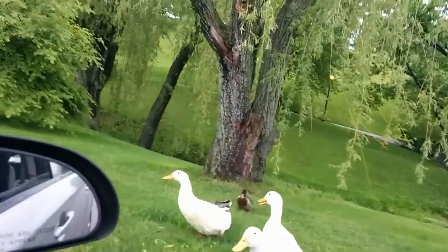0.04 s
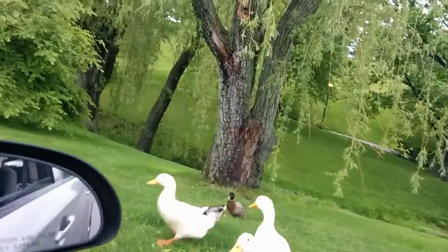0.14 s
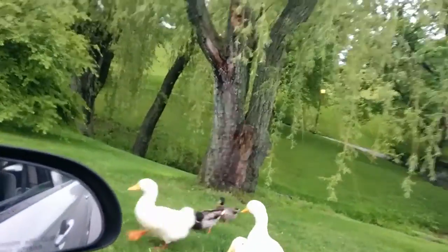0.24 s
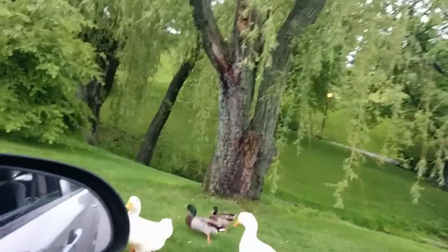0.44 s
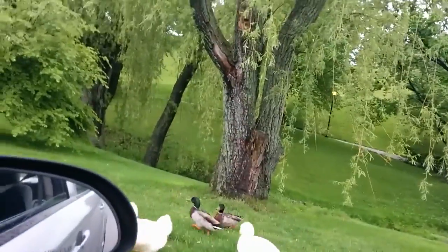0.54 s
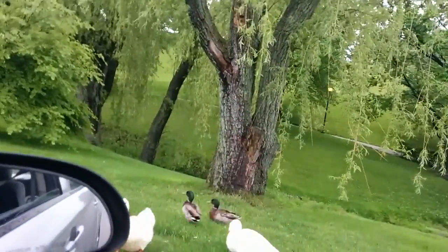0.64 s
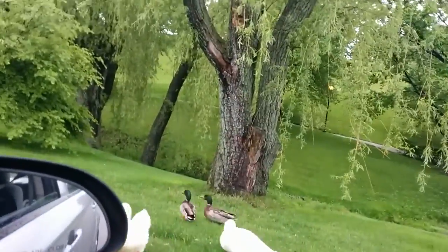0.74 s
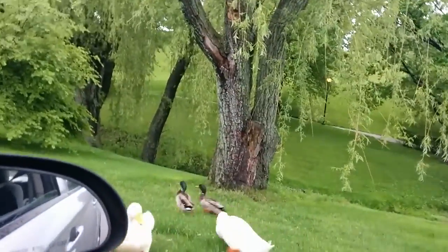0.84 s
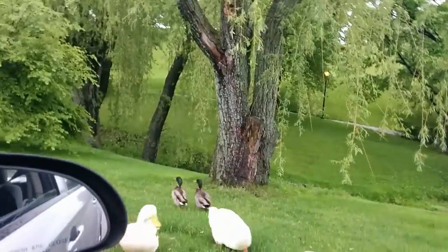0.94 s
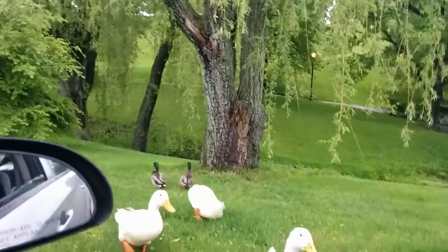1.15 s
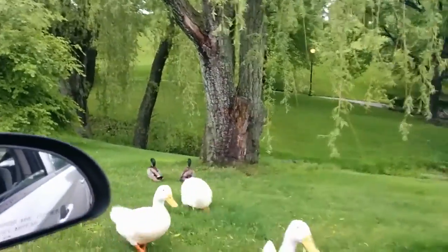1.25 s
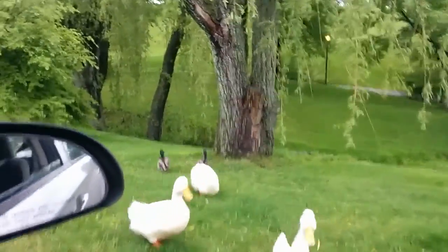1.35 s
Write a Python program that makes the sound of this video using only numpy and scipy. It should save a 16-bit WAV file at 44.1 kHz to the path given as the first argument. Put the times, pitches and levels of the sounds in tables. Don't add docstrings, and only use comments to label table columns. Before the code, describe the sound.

Ducks quacking: three quick loud calls from a near hen, softer rasps and mutters behind

```python
import sys
import numpy as np
from scipy import signal
from scipy.fft import rfft, irfft
from scipy.io import wavfile

SR = 44100
rng = np.random.default_rng(int(sys.argv[2]) if len(sys.argv) > 2 else 0)


def amplitude_ratio(level_db):
    exponent = np.asarray(level_db, float) / 20
    return 10 ** exponent


def file_out(sig):
    cols = np.atleast_2d(sig).T
    lim = np.clip(cols, -1, 1)
    pcm = np.round(lim * 32767).astype(np.int16)
    wavfile.write(sys.argv[1], SR, pcm)


N = 61739
T = np.arange(N) / SR

# start_s, length_s, level_db, pulse_rate_hz, top_resonances_db
CHATTER = [(-.03, 0.087, -41, 127.3, -2), (.04, 0.061, -51, 117.8, 1.5), (.385, 0.023, -35, 159, -5.5),
           (.52, 0.032, -38, 143.3, -30.5)]
# centre_hz, width_hz, level_db
FAR_LOW = [(565, 300, -1.5), (958, 240, 1), (1110, 237, 5), (1450, 370, -13), (1667, 67, -8)]
FAR_HIGH = [(2556, 180, -10.5), (3000, 260, -1.5), (3660, 200, -37)]
# start_s, length_s, level_db
RUSTLES = [(-.02, 0.1, -60.5), (0.125, 0.21, -59.5), (0.371, 0.51, -65.5), (0.579, 0.13, -56.5),
           (0.78, 0.076, -108), (0.859, 0.13, -64), (1.272, 0.61, -68), (1.292, 0.0088, -77),
           (.891, .016, -52), (1.27, 0.024, -71.5)]
# frequency_hz, density_db
RUSTLE_SPECTRUM = [(3000, 4), (4500, -5.5), (7000, 1), (9500, -4.5), (12000, -14.5), (16000, -22.5)]
AIR_SPECTRUM = [(40, -7), (100, -5.5), (180, -4.5), (440, -8), (900, -13), (2200, -23.5), (4400, -36),
                (15900, -37)]
# time_s, level_db
BREEZE = [(0, 2), (.1, 0.5), (.25, 5), (.35, -2.5), (.55, 5.5), (.72, -5), (.9, -7.5), (1.02, -2),
          (1.2, -2.5), (1.4, -4.5)]
# start_s, length_s, peak_db, pitch_hz
PUFFS = [(-.01, 0.062, -54.5, 127), (.12, 0.026, -56, 151), (.21, 0.089, -56.5, 82), (.3, 0.036, -60, 83.8),
         (.575, 0.03, -61, 78.5), (.62, 0.054, -59.5, 81.6), (.62, 0.032, -54, 170),
         (1.19, 0.043, -52.5, 91), (1.3, 0.031, -71, 90.4)]
# start_s, length_s, level_db, pulse_rate_hz, top_resonances_db
MURMURS = [(.935, .15, -60, 73, -9), (0.94, 0.12, -48, 63, 4), (0.0, 0.05, -55.5, 89, -1.5),
           (.55, 0.069, -46, 76, 2.5)]
# centre_hz, width_hz, level_db
CHEST_LOW = [(184.6, 44, 0.61), (285, 44, 1.2)]
CHEST_HIGH = [(354.5, 43, 0.57)]
# start_s, length_s, level_db, ring_hz
CLACKS = [(0.123, 0.036, -42, 3180), (.503, 0.022, -44, 3640), (0.504, 0.02, -47.5, 2565),
          (0.53, 0.029, -47.5, 2710), (.892, 0.0095, -36, 4946), (0.9, 0.034, -46.5, 3134),
          (0.895, 0.022, -45.5, 3750), (1.303, 0.024, -44.5, 3716), (1.302, 0.023, -48.5, 3200),
          (1.302, .05, -53.5, 2550)]
# start_s, length_s, level_db, pulse_rate_hz, top_resonances_db
YOUNG = [(.128, 0.07, -40.5, 124.7, -9), (.16, 0.085, -41, 150.7, -4.5)]
# centre_hz, width_hz, level_db
YOUNG_LOW = [(495, 170, -7.5), (1170, 89, 3), (1440, 110, 1), (1855, 87, 4.5), (2430, 240, -6.5)]
YOUNG_HIGH = [(2790, 150, -12), (3330, 95, -26), (3820, 95, -5)]
# strongest_pulse_s, peak_db, pulse_rate_hz, throat_pitch_factor, top_resonances_db
QUACKS = [
    (0.2507, -15, 144, 1.016, -11.5),
    (0.4328, -10, 182.2, 1.034, -3.5),
    (0.5777, -14.5, 164.7, 1.1, -1),
]
# time_s, effort_db, hoarse_top_db
EFFORT = [
    [(.232, -29, 9), (.237, -4, 6), (.244, -2.5, -4), (.251, -1.4, -1), (.258, -2, -0.5), (.266, -11.5, 4),
     (.273, -10.5, 8), (.281, -19.5, 7), (.288, -39, 5)],
    [(.405, -30, 11), (.416, -15.5, 6), (.428, -5.5, 1.5), (.433, 0.76, -6.5), (.439, -5.5, 11),
     (.451, -8.5, 7), (.464, -12.5, -4.5), (.479, -21, 15.5), (.486, -47, 10)],
    [(.557, -30, 22), (.564, -16, 20), (.572, -9.5, 16.5), (.578, -0.23, -1), (.585, -6.5, 5.5),
     (.591, -2, 0.5), (.598, -10.5, -1.5), (.604, -10.5, 3), (.612, -35.5, 11.5)],
]
# centre_hz, width_hz, level_db
HEN_LOW = [(512, 239, 0), (1076.5, 95.6, 9), (1507, 92, 2), (1751, 172, -7.5), (2502, 63, -15.5),
           (1276, 121, -3)]
HEN_HIGH = [(3602, 370, -18), (4378, 310, -17.5), (5007, 160, -16.5), (5756, 220, -19.5), (6528, 250, -29),
            (7620, 820, -40.5), (11100, 3250, -43.5)]
HEN_CHEST = [(170, 100, -11)]
# start_s, length_s, level_db, pitch_hz, glide_hz_per_s
HUMS = [(.215, 0.032, -31, 680, -1000), (.392, 0.028, -38, 1000, 2996.5), (.402, 0.023, -31, 700, -2000),
        (.549, 0.0195, -30, 810, -12000), (.556, 0.023, -27, 1490, -3000), (.549, 0.017, -36, 1820, 1003),
        (.526, 0.02, -37.5, 960, -3000), (.835, 0.1, -55, 770, -100), (1.3, .078, -50.5, 1100, 898),
        (1.2, 0.031, -72, 1700, 300), (.82, 0.072, -61.5, 370, -100), (1.31, 0.068, -45.5, 595, 200),
        (1.325, 0.047, -48.5, 2050, -500)]
# start_s, length_s, level_db, pulse_rate_hz, top_resonances_db
RASPS = [(0.353, 0.094, -42.5, 110.3, -18), (0.6, 0.062, -46, 84.2, -13.5), (0.652, 0.051, -50, 94.9, -2.5),
         (0.829, .086, -42, 90, -15), (1.037, 0.03, -67.5, 90.5, -32), (1.063, 0.12, -53.5, 119, -13.5),
         (1.149, 0.065, -65.5, 102.6, -12), (1.108, 0.061, -48.5, 93.8, -12.5),
         (1.315, 0.067, -43.5, 98.7, -18.5)]
# centre_hz, width_hz, level_db
DRAKE_LOW = [(860, 94, -11), (1798, 100, 3), (2078, 162, 0.5), (2374, 50, -3)]
DRAKE_HIGH = [(2680, 250, 4), (2880, 120, 1.5)]
# start_s, length_s, level_db, pulse_rate_hz, top_resonances_db
HISSES = [(.37, 0.063, -65.5, 109.8, 7.5), (.635, 0.06, -50.5, 89.6, -14)]
# centre_hz, width_hz, level_db
HISS_LOW = [(5750, 300, 0.5), (6300, 400, -1.5)]
HISS_HIGH = [(3900, 530, 7), (6900, 464, -32)]
# start_s, length_s, peak_db, pitch_hz
MUTTER = [(.935, 0.056, -49.5, 169.8), (.965, 0.06, -63, 320), (1.025, 0.048, -54, 277.8),
          (1.11, 0.12, -56.5, 189), (1.125, 0.065, -54, 293.5), (1.19, 0.062, -48, 161),
          (1.228, 0.11, -49, 198.4), (1.258, 0.053, -49.5, 175.3), (1.23, 0.065, -58, 303),
          (1.295, 0.055, -48, 287), (1.3, 0.059, -42.5, 176.3), (1.322, 0.09, -43.5, 172.9),
          (1.358, 0.043, -44.5, 170), (1.35, 0.044, -50, 330)]
# start_s, length_s, level_db, pulse_rate_hz, top_resonances_db
GRUMBLES = [(1.062, 0.086, -54.5, 125.1, 2.5), (1.13, 0.095, -52.5, 93.4, -15),
            (1.222, 0.045, -55, 94.5, -33), (1.255, 0.089, -55, 99, -10), (1.3, 0.061, -46, 115.6, -1.5),
            (1.34, .05, -45, 110.7, -7)]
# centre_hz, width_hz, level_db
CLOSED_LOW = [(530, 225, 3), (769, 39, 9.2), (890, 48, 3.2)]
CLOSED_HIGH = [(970, 220, 2), (1040, 140, -4)]

RASP_ROUGH, RASP_OPEN_S = 0.7, 0.0045


def unit(x):
    return x / np.sqrt(np.mean(x ** 2) + 1e-20)


def drift(hz):
    r = np.exp(-2 * np.pi * hz / SR)
    noise = rng.standard_normal(N + SR)
    return unit(signal.lfilter([1], [1, -2 * r, r * r], noise)[SR:])


def throat(x, peaks):
    out = 0
    for k, (hz, width_hz, db) in enumerate(peaks):
        r = np.exp(-np.pi * width_hz / SR)
        poles = [1, -2 * r * np.cos(2 * np.pi * hz / SR), r * r]
        ring = signal.lfilter([1 - r * r, 0, r * r - 1], poles, x)
        out = out + (-1) ** k * amplitude_ratio(db) * ring
    return out


def gate(start, length, edge=0.016, sag_db=0.0):
    ramp = np.clip(np.minimum(T - start, start + length - T) / edge, 0, 1)
    sag = amplitude_ratio(-sag_db * np.clip((T - start) / length, 0, 1))
    return np.sin(ramp * np.pi / 2) ** 2 * sag


def pulses(cycles, rough, shimmer_db, open_s):
    whole = np.floor(cycles).astype(int)
    shimmer = amplitude_ratio(shimmer_db * rng.standard_normal(999)[whole % 999])
    snaps = np.clip(np.diff(whole, prepend=whole[0] - 1), 0, 1) * shimmer
    r = np.exp(-2 / (open_s * SR))
    puff = signal.lfilter([1 - r], [1, -2 * r, r * r], snaps) * np.sqrt(8 / (open_s * SR))
    return (1 - rough) * snaps + rough * puff * rng.standard_normal(N) + 1e-18


def coloured(points):
    hz, db = np.transpose(points)
    f = np.arange(N // 2 + 1) * SR / N + 1
    shape = amplitude_ratio(np.interp(np.log(f), np.log(hz), db, left=-80))
    return unit(irfft(rfft(rng.standard_normal(N)) * shape, N))


def flock(calls, low, high, rough, open_s, jitter, band_hz):
    out = 0
    for s, length, db, hz, top_db in calls:
        cycles = hz * (T - s) + 0.2445 + jitter * drift(40)
        source = pulses(cycles, rough, shimmer_db=0.5, open_s=open_s)
        body = throat(source, low)
        voice = body + amplitude_ratio(top_db) * throat(source, high)
        out = out + amplitude_ratio(db) * gate(s, length) * voice / np.std(body)
    band = signal.butter(3, band_hz, "band", fs=SR, output="sos")
    return signal.sosfilt(band, out)


def farther_hens():
    return flock(CHATTER, FAR_LOW, FAR_HIGH, 0.57, 0.0063, jitter=0.16, band_hz=[450, 3500])


def lawn():
    steps = 0
    for s, length, db in RUSTLES:
        steps = steps + amplitude_ratio(db) * gate(s, length, min(0.02, length / 8), sag_db=14.0)
    grass = steps * amplitude_ratio(1.7 * drift(200)) * coloured(RUSTLE_SPECTRUM)
    air_db = -59 + np.interp(T, *np.transpose(BREEZE)) + drift(30)
    return grass + amplitude_ratio(air_db) * coloured(AIR_SPECTRUM)


def swells(rows):
    out = 0
    for s, length, db, hz in rows:
        level = amplitude_ratio(db + 7.5 + 1.0 * drift(62)) * gate(s, length, length / 2, sag_db=1.5)
        out = out + level * np.sin(2 * np.pi * hz * (T - s) + 0.35 * drift(61))
    return out


def murmurs():
    return flock(MURMURS, CHEST_LOW, CHEST_HIGH, 0.72, 0.0052, jitter=0.13, band_hz=[140, 400])


def clacks():
    rattle_hz, ring_width_hz, spray_db = 260, 260, -19
    out = 0
    for s, length, db, hz in CLACKS:
        cycles = rattle_hz * (T - s) + 0.057 * drift(170)
        source = pulses(cycles, 0.66, shimmer_db=-2.0, open_s=0.003)
        ring = throat(throat(source, [(hz, 2 * ring_width_hz, 0)]), [(hz, ring_width_hz, 0)])
        spray = throat(throat(source, [(hz, hz, 0)]), [(hz, hz, 0)])
        clack = unit(ring) + amplitude_ratio(spray_db) * unit(spray)
        out = out + amplitude_ratio(db) * gate(s, length, 0.003, sag_db=13.0) * clack
    return out


def young_hen():
    return flock(YOUNG, YOUNG_LOW, YOUNG_HIGH, RASP_ROUGH, RASP_OPEN_S, jitter=0.121, band_hz=[450, 4300])


def hums():
    out = 0
    for s, length, db, hz, glide_hz in HUMS:
        glide = np.pi * glide_hz * (T - s - length / 2) ** 2
        phase = 2 * np.pi * hz * (T - s) + glide + 0.35 * drift(100)
        level = amplitude_ratio(db + 1.25 * drift(50)) * gate(s, length, length / 4, sag_db=-3.0)
        out = out + level * np.sin(phase)
    return out


def near_hen():
    sag_hz_per_s, open_s, shimmer_db = 550, 0.0022, 1.2
    rough, top_rough, bright_power = 0.33, 0.55, 2.2
    top_lag_s_per_khz = 0.0006
    out = hums()
    for (s, db, hz, scale, top_db), rows in zip(QUACKS, EFFORT):
        at, effort_db, hoarse_db = np.transpose(rows)
        u = np.clip(T - s, -0.1, 0.1)
        effort = amplitude_ratio(db + 23 + np.interp(T, at, effort_db, left=-90, right=-90))
        cycles = hz * u - sag_hz_per_s * u ** 2 / 2 + 0.035 * drift(80)
        source = effort * pulses(cycles, rough, shimmer_db, open_s)
        body = throat(source, np.multiply(HEN_LOW, [scale, 1, 1]))
        out = out + throat(body, [(1120, 3400, 0.0078)]) + throat(source, HEN_CHEST)
        hoarse = amplitude_ratio((1.5 - bright_power) * (db + 21.5) + top_db + np.interp(T, at, hoarse_db))
        top = effort ** bright_power * hoarse * pulses(cycles, top_rough, shimmer_db, open_s)
        top = throat(top, [(5600, 5000, 0.016)])
        for peak in HEN_HIGH:
            lag_s = max(7 - peak[0] / 1000, 0) * top_lag_s_per_khz
            out = out + np.roll(throat(top, [peak]), int(lag_s * SR))
    return out


def drakes():
    rasp = flock(RASPS, DRAKE_LOW, DRAKE_HIGH, RASP_ROUGH, RASP_OPEN_S, jitter=0.035, band_hz=[1620, 4200])
    lowest = DRAKE_LOW[:1]
    under = flock(RASPS, lowest, lowest, RASP_ROUGH, RASP_OPEN_S, jitter=0.017, band_hz=[600, 1000])
    return rasp + amplitude_ratio(-22.5) * under


def hisses():
    return flock(HISSES, HISS_LOW, HISS_HIGH, 0.95, 0.0063, jitter=0.17, band_hz=[4000, 7500])


def throb():
    drum_hz, drum_db = 1705, 3
    out = 0
    for s, length, db, hz, _ in RASPS[1:-1]:
        level = amplitude_ratio(db + drum_db + drift(30)) * gate(s, length, 0.012, sag_db=4)
        swell = 1.1 + np.cos(2 * np.pi * hz * (T - s))
        out = out + level * swell * np.sin(2 * np.pi * drum_hz * T + 0.5 * drift(40))
    return out


def grumbles():
    return flock(GRUMBLES, CLOSED_LOW, CLOSED_HIGH, 0.78, 0.0028, jitter=0.095, band_hz=[450, 1200])


def scattered_tail(ducks):
    t60_s = 0.13
    lag = T[:SR // 3]
    scatter = rng.standard_normal(len(lag)) * amplitude_ratio(-60 * lag / t60_s) * (lag > 0.004)
    dulled = signal.lfilter([0.5], [1, -0.5], ducks)
    return signal.fftconvolve(dulled, scatter / np.linalg.norm(scatter))[:N]


def scene():
    ducks = farther_hens() + murmurs() + young_hen() + near_hen()
    ducks = ducks + drakes() + hisses() + throb() + grumbles()
    mix = ducks + amplitude_ratio(-19) * scattered_tail(ducks)
    mix = mix + lawn() + swells(PUFFS) + clacks() + swells(MUTTER)
    return mix[None]


def low_pass(x):
    return signal.sosfilt(signal.butter(12, 16020, fs=SR, output="sos"), x)


def record(dry):
    low_cut = signal.butter(2, 40, "high", fs=SR, output="sos")
    mix = signal.sosfilt(low_cut, dry)
    return low_pass(mix)


dry = scene()
out = record(dry)
file_out(out)
```